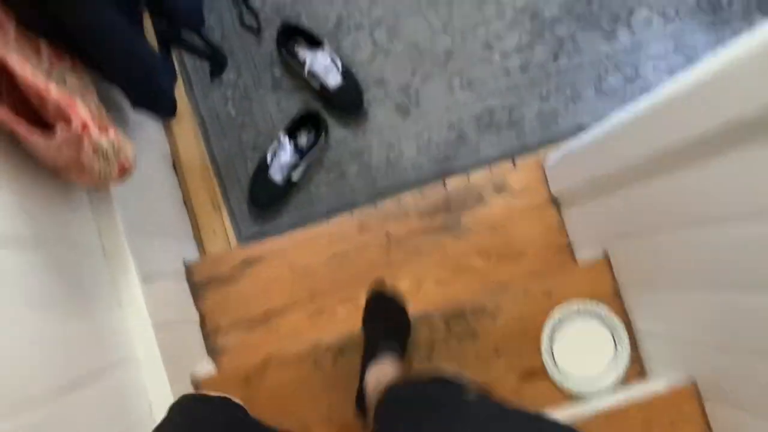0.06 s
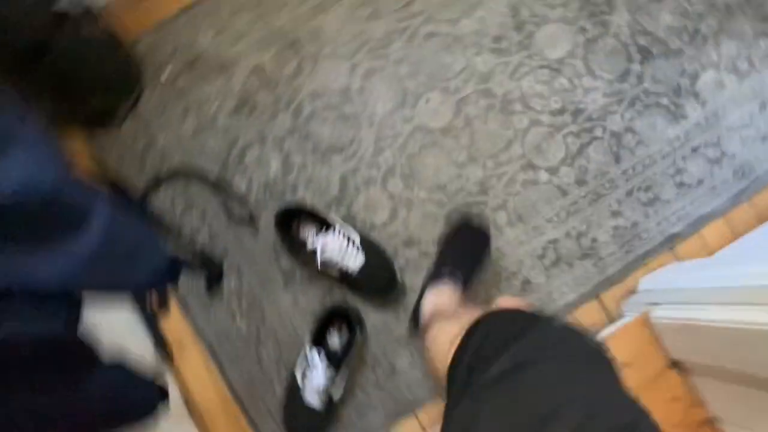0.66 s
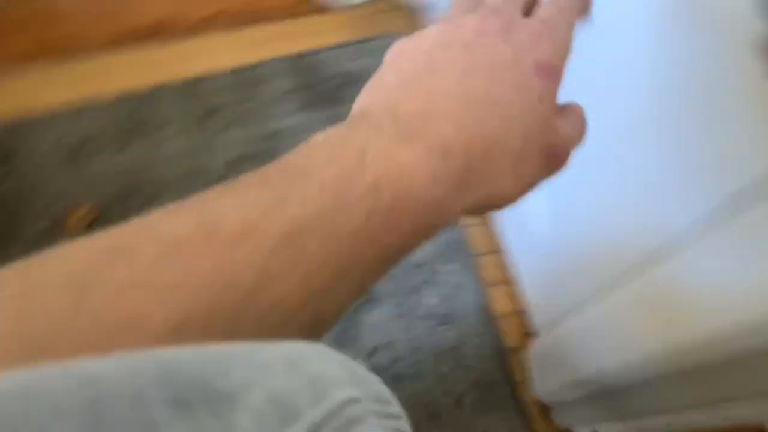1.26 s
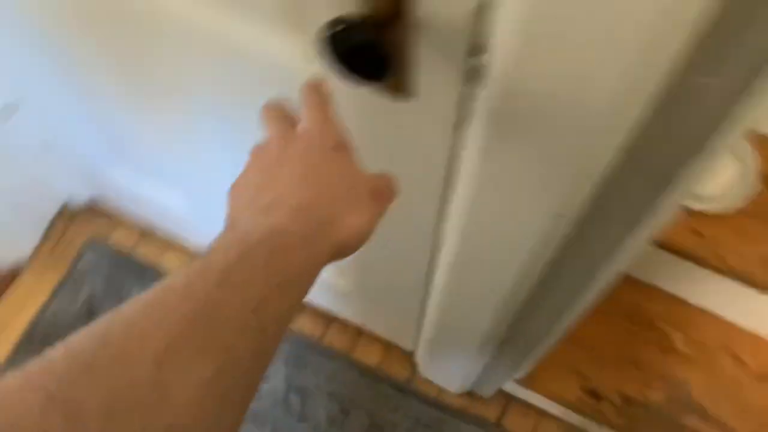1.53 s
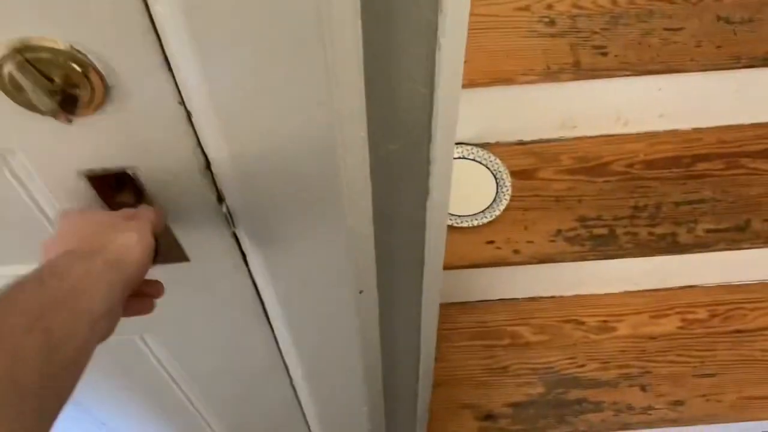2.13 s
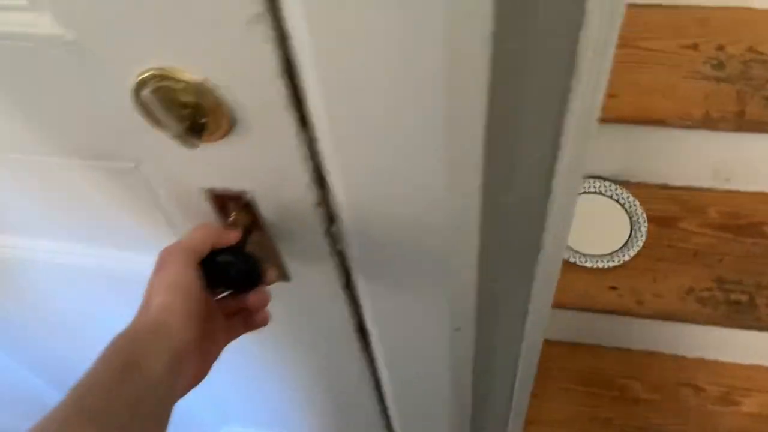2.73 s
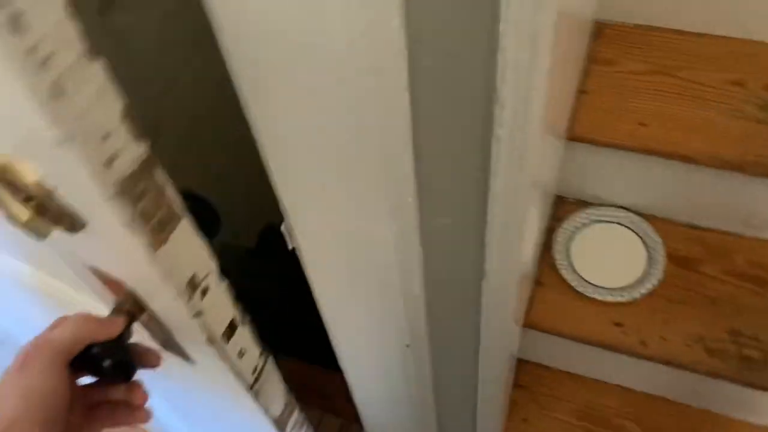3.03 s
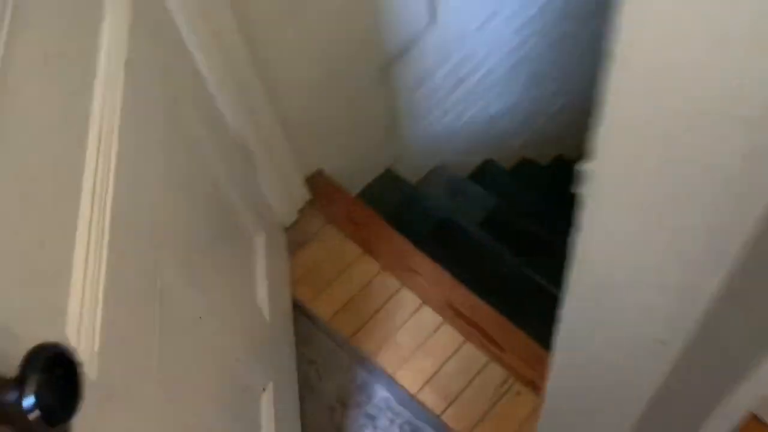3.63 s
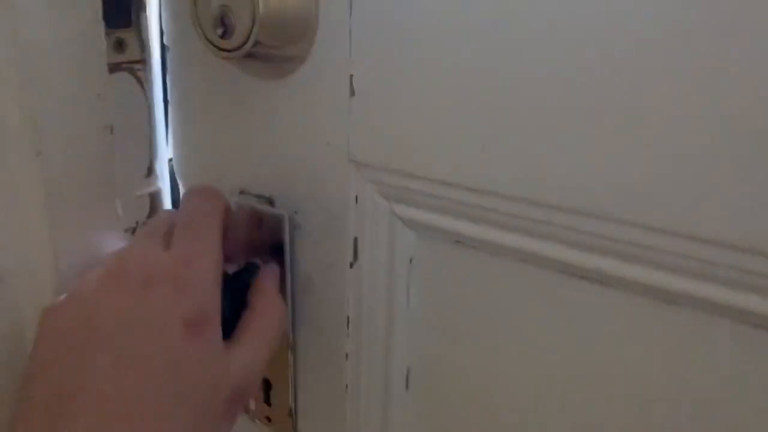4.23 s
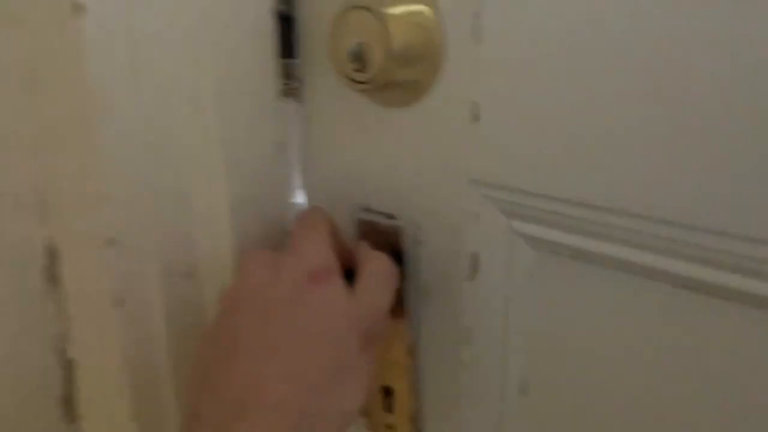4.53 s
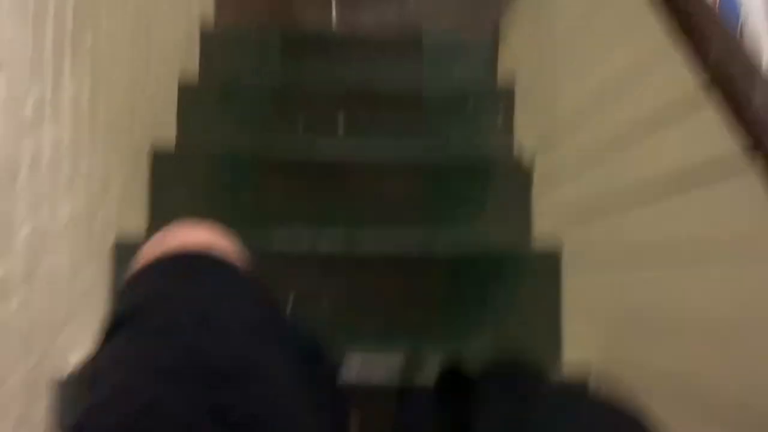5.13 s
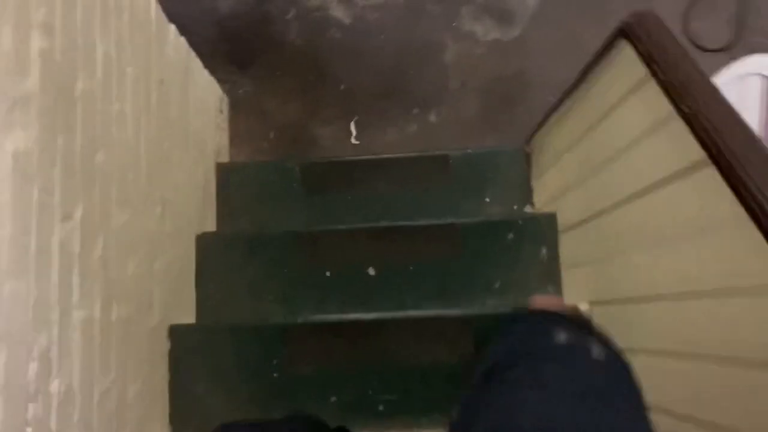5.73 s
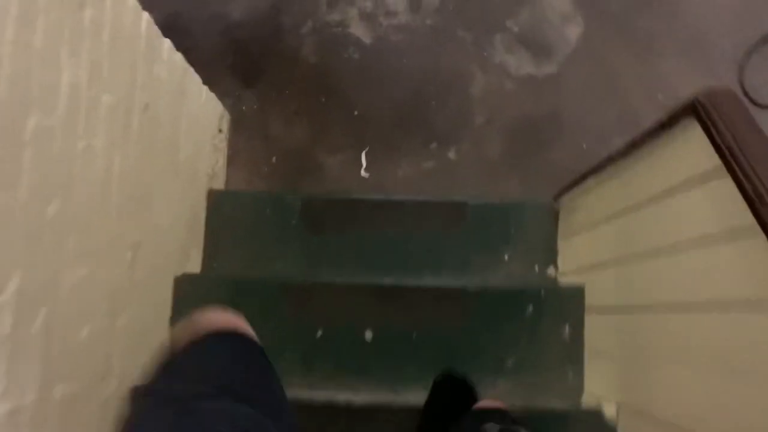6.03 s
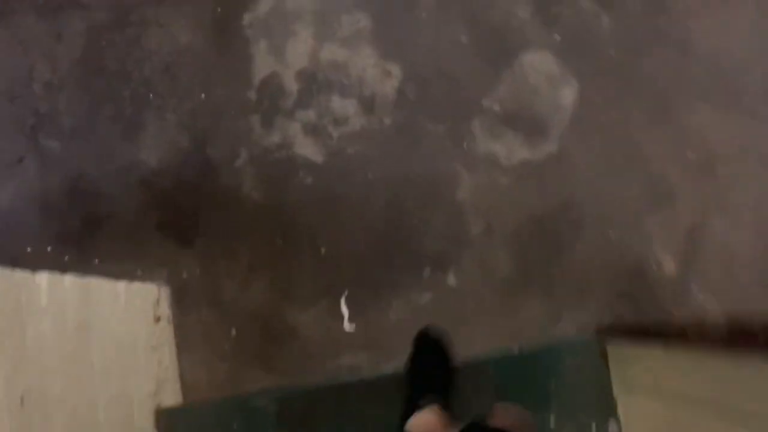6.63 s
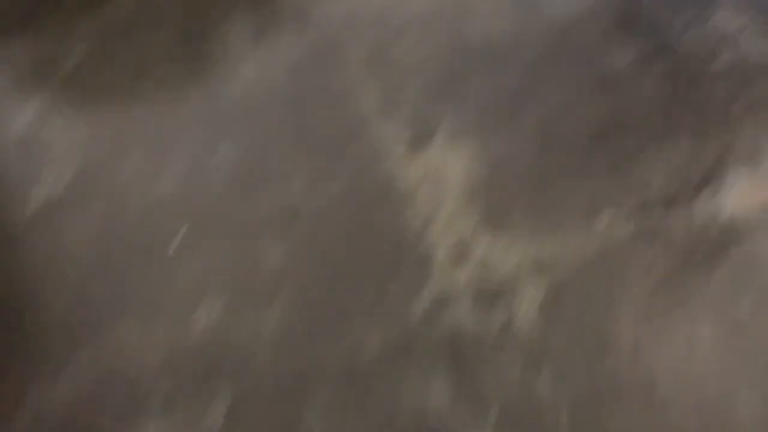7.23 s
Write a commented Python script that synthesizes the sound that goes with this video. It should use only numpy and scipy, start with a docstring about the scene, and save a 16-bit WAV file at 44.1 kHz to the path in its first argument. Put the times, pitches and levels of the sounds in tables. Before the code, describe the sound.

Socked feet thud down wooden stairs in a house, the boards ringing hollowly, and clothes rustle close to the microphone. An old doorknob rattles and clicks, then the door opens with a short, high hinge squeal. The door rubs and clatters, then bangs shut with a metal latch snap. Softer footsteps go down a second flight over a low room hush.

```python
"""A house with wooden stairs. Someone in socks thuds down a flight, ringing the boards, crosses a rug
and rattles an old door knob. The door swings open; its dry hinge sticks, slips and squeals. Pulled shut
from behind, it bangs and latches with a metal snap. Steps go down a second flight to a cellar floor.
Clothes rustle close by, over a low hush."""
import sys
import numpy as np
from scipy import signal
from scipy.fft import rfft, irfft, next_fast_len
from scipy.io import wavfile
from scipy.ndimage import uniform_filter1d

SR = 44100
rng = np.random.default_rng(int(sys.argv[2]) if len(sys.argv) > 2 else 0)


def store_wav(level_fs):
    """Save 16-bit WAV to argv[1]."""
    pcm = np.round(np.clip(np.atleast_2d(level_fs), -1, 1) * 32767)
    wavfile.write(sys.argv[1], SR, pcm.T.astype(np.int16))


N = 328986
TIME_S = np.arange(N) / SR
AGE_S = TIME_S[:36000]  # time since a strike
BEHIND_S, CELLAR_S = 3.7, 5.092  # door heard from behind; second flight; ringing is cut off at each
TOP_HZ = 16100
BOARD_OVERTONE_RATIO = 1.67

# Table levels are relative; the functions add their own gains.
# Footsteps. Each row: start in seconds, leg swing, toe and sole in dB, landing lag in seconds,
# boom and knock in dB, roll to the heel in seconds, scuff in dB.
STEPS = [(.104, -70.5, -45, -63, 0.063, -37, -42.5, 0.032, -47.5),
         (.449, -56, -42, -68, 0.025, -36, -39.5, 0.013, -50.5),
         (.766, -84, -46, -40, 0.0064, -16.5, -33, 0.091, -44.5),
         (1.271, -68.5, -59, -48, 0.011, -27, -48, 0.044, -58),
         (5.357, -62, -49, -74, 0.016, -28, -33.5, 0.16, -56),
         (5.871, -62.5, -45, -47.5, 0.03, -34, -39, 0.15, -50),
         (6.315, -63.5, -43, -38, .03, -28, -31, .125, -56),
         (6.671, -58, -46, -48, 0.034, -37.5, -39.5, 0.054, -59),
         (7.19, -62.5, -54.5, -73, 0.032, -40, -56, 0.029, -60)]
# Flights. Each: boom in Hz, boom and knock t60 in seconds, tread ring in Hz, ring over knock in dB,
# heel over landing in dB.
UPPER_FLIGHT = (44, 0.61, 1.38, 173, -0.5, -22)
CELLAR_FLIGHT = (54.5, 0.21, 0.29, 100, 1.5, -6)
# Sole slaps and board ticks. Each row: start in seconds, slap in dB, tick in dB, t60 in seconds.
TAPS = [(.105, -61, -72, 0.017), (.178, -61, -89, 0.25), (.218, -50.5, -52.5, 0.074),
        (.467, -51, -57.5, 0.037), (.765, -54, -87, 0.029), (.86, -62, -67.5, 0.41),
        (1.022, -61, -62.5, 0.017), (5.958, -59, -83, 0.042), (6.364, -52, -65, 0.038),
        (6.459, -48, -54.5, 0.027), (6.786, -57.5, -67, 0.14), (7.192, -53.5, -55.5, 0.016)]
# Boards and door ringing at one pitch. Each row: start in seconds, level in dB, pitch in Hz, t60 in seconds.
BOARD_KNOCKS = [(.119, -30, 66, 0.24), (0.174, -25.5, 59, 0.39), (.452, -32, 207.4, 0.27),
                (.478, -29.5, 64.4, 0.44), (.665, -43.5, 380, 0.11), (.777, -20, 166.7, 0.32),
                (.776, -29.5, 259, .33), (.82, -47.5, 555, 0.84), (1.28, -39, 250, 0.18),
                (4.124, -29, 174.4, 0.22), (4.141, -31, 1260, 0.042), (4.799, -16, 387, 0.064),
                (4.8, -27.5, 868, 0.088), (4.809, -13, 141.4, 0.21), (4.866, -19, 109, 0.2),
                (5.368, -43.5, 332, 0.34), (5.385, -28, 125.7, 0.49), (5.906, -27, 74.8, 0.44),
                (6.386, -14.5, 81.4, 0.11), (6.398, -38, 1040, 0.071)]
# Board and panel modes. Each row: frequency in Hz, level in dB, share of the knock's t60.
BOARD_MODES = [(91.6, 4, 0.41), (129.4, -4, 0.99), (159.2, 8, 0.37), (210.6, 0.5, 0.71), (314, -26, 0.2),
               (434.6, -10, 0.72)]
# Clothes. Each row: centre in seconds, half-length in seconds, scuff in dB, swish in dB.
RUSTLES = [(1.52, 0.28, -55, -59.5), (5.73, 0.11, -60.5, -62.5), (7.44, 0.065, -82, -47)]
# Hand strokes on knob and door. Each row: peak in seconds, panel shudder in dB, scuff in dB.
HAND_STROKES = [(1.86, -37.5, -41), (2.267, -34, -43), (2.93, -42, -49.5), (3.265, -78, -41.5),
                (3.36, -38.5, -41), (4.2, -31, -46.5), (4.451, -28.5, -39), (4.878, -22.5, -34.5)]
# Knob, latch and door edge. Each row: start in seconds, wood in dB, metal in dB, t60 in seconds.
CLACKS = [(1.782, -44, -43.5, 0.027), (1.802, -28.5, -27, 0.063), (2.094, -30, -28.5, 0.0066),
          (2.246, -41, -57, 0.064), (2.327, -36.5, -44.5, 0.07), (2.609, -26.5, -25, 0.02),
          (2.622, -35, -32, 0.13), (2.705, -38.5, -38.5, 0.094), (2.895, -39.5, -66, 0.081),
          (3.272, -44.5, -39, 0.083), (3.332, -36.5, -34.5, 0.067), (3.418, -43, -43, .1),
          (4.046, -33.5, -32.5, 0.063), (4.113, -45.5, -51, 0.11), (4.184, -30, -47, 0.044),
          (4.192, -33.5, -59, 0.07), (4.206, -33, -43, 0.059), (4.217, -39, -64, .04),
          (4.291, -36, -41, 0.033), (4.375, -37, -36.5, 0.16), (4.397, -40, -37.5, 0.24),
          (4.43, -32.5, -38, 0.13), (4.672, -43, -47, 0.03), (4.784, -30.5, -27.5, 0.039),
          (4.814, -36, -26.5, 0.029), (4.827, -35, -41, 0.43), (4.874, -33, -28.5, 0.04),
          (4.894, -40, -23, 0.015), (4.9, -33, -28.5, 0.038), (4.994, -37, -55, 0.071),
          (5.066, -39.5, -31, 0.006)]
# Door against frame. Each row: start in seconds, boom, knock and panel ring in dB, ring in Hz.
DOOR_BUMPS = [(1.803, -58, -38, -35.5, 308), (2.324, -26.5, -37.5, -37.5, 315), (2.607, -37, -36, -29, 332),
              (3.345, -66, -53, -32, 327), (3.709, -33, -44, -43, 162), (3.904, -34, -28.5, -39.5, 660),
              (4.441, -18.5, -37, -35.5, 149), (4.805, -7.5, -21.5, -32, 460),
              (4.912, -12.5, -37, -53, 404), (5.006, -11.5, -60, -33, 108)]
# Door sides. Each: boom in Hz, boom t60 in seconds, knock t60 in seconds.
DOOR_FRONT, DOOR_BEHIND = (46, 0.68, 0.92), (52.1, 0.24, 0.32)
# Latch. Each row: start in seconds, snap in dB, spring zing in dB.
LATCH_SNAPS = [(1.801, -20, -38), (1.95, -44.5, -69), (2.094, -27, -43), (2.327, -34.5, -58),
               (2.609, -29, -30), (4.047, -38, -48), (4.376, -46, -39), (4.812, -23, -52),
               (4.893, -28.5, -51), (4.899, -30, -51)]
# Small metal parts. Each row: start in seconds, level in dB, pitch in Hz, t60 in seconds.
TWANGS = [(2.61, -45, 6480, .38), (2.721, -55, 4590, 1.1), (4.046, -55, 4640, .63)]
# Hinge stick-slip rate. Each row: time in seconds, rate in Hz.
HINGE_PITCH = [(2.915, 2540), (3.025, 2807), (3.06, 2780), (3.105, 2570), (3.2, 2551), (3.33, 2470),
               (3.4, 2427), (3.435, 2305), (3.5, 2150), (3.58, 2066), (3.69, 2030)]
# Hinge strength. Each row: time in seconds, fundamental, octave and higher overtones in dB.
HINGE_LEVELS = [(2.883, -44, -49, -74.5), (2.9, -37, -38.5, -52.5), (2.94, -37.5, -44.5, -50),
                (3.085, -35.5, -44, -43.5), (3.125, -24.5, -33.5, -38.5), (3.185, -26, -56, -46),
                (3.213, -24.5, -38.5, -39.5), (3.291, -29, -33, -37.5), (3.388, -41, -44.5, -38),
                (3.44, -36.5, -34, -42), (3.53, -36.5, -36, -34), (3.62, -37, -47, -32.5),
                (3.663, -28.5, -45, -31), (3.693, -46, -62, -47)]
# Hinge harmonics from the third up. Each entry: level in dB.
HINGE_OVERTONES_DB = [2.5, -4, -6, 1.5, 9, -6]
# Hinge rasps as the door speeds up and slows. Each row: centre and half-width in seconds, strength 0-1.
HINGE_RASPS = [(2.985, .075, .9), (3.335, .04, .9), (3.45, .065, 1)]
# Lock case modes. Each row: frequency in Hz, level in dB.
LOCK_MODES = [(690, -2), (845, 5), (1125, 3), (2300, 2), (2875, -11)]

# Tone colours of the sounds as heard, several with a narrow treble gap near 12 kHz.
# Each row: frequency in Hz, spectral level in dB.
HUSH_EQ = [(20, -1), (45, 8), (120, -6), (300, -14), (700, -26), (3000, -28), (9000, -37.5), (12000, -61),
           (16000, -37)]
SCUFF_EQ = [(200, 8.5), (500, 5.5), (1200, 3.5), (1700, -2), (2500, -2), (4000, -19.5), (9000, -51)]
SWISH_EQ = [(1200, -8), (3800, 0), (7000, -5), (9800, -4), (11800, -27), (13800, -6.5), (16000, -66)]
SHUDDER_EQ = [(30, -21), (70, 11.5), (160, -4.5), (400, -10), (900, -25.5), (2500, -46)]
PANEL_FRONT_EQ = [(40, -9), (100, -11), (145, 9), (310, -2.5), (500, -2), (900, -35), (2500, -67)]
PANEL_BEHIND_EQ = [(40, 1.5), (100, -3), (150, -2), (195, -5.5), (250, -64), (430, -14), (1000, -110)]
WOOD_FRONT_EQ = [(120, -8), (300, -49.5), (550, -4.5), (1100, 8.5), (1600, -3), (2200, 2.5), (3200, -7),
                 (5000, -10.5), (12000, -62)]
WOOD_BEHIND_EQ = [(300, -39), (750, 0.5), (1150, 5.5), (2800, -1), (5000, -10), (12000, -39)]
METAL_EQ = [(800, -25), (2500, 0.5), (4000, 6.5), (6000, 2), (9300, 1.5), (10800, 0), (11900, -52),
            (13800, 1), (16000, -36)]
SNAP_EQ = [(3000, -19), (9500, 3), (11800, -5), (14000, -9), (16000, -16)]
SPRING_EQ = [(11800, -29), (13300, 17), (14300, 0), (15100, 6), (15700, -12)]
HINGE_EQ = [(6200, 1.5), (7500, -9), (8400, 3.5), (10000, 6), (11500, 0), (14300, 4.5), (15500, -7.5)]
# Stairwell decay. Each row: frequency in Hz, t60 in seconds.
STAIRWELL_T60 = [(200, 0.064), (1000, 0.35), (3000, 0.24), (8000, 0.19), (15000, 0.046)]
# Stereo likeness. Each row: frequency in Hz, left-right correlation.
CORRELATION = [(250, 0.83), (500, 0.43), (1200, 0.049)]


def gain(db):
    """Decibels to amplitude."""
    return 10 ** (np.asarray(db) / 20)


def unit_rms(x):
    """Scales to rms 1."""
    return x / np.sqrt(np.mean(x ** 2) + 1e-20)


def lookup(table, hz):
    """Interpolates on a log-frequency axis."""
    table_hz, value = np.transpose(table)
    return np.interp(np.log(hz + 1), np.log(table_hz + 1), value)


def decay(t60_s):
    """Exponential decay after a strike."""
    return np.exp(-np.log(1000) * AGE_S / np.maximum(t60_s, 1e-3))


def rise(contact_s):
    """Smooth build-up over a contact."""
    return np.sin(np.pi / 2 * np.minimum(AGE_S / contact_s, 1)) ** 2


def drift(count, hz):
    """Random drift, rms 1, rolled off above hz."""
    bins_hz = np.fft.rfftfreq(count, 1 / SR)
    return unit_rms(irfft(rfft(rng.standard_normal(count)) * np.exp(-(bins_hz / hz) ** 2), count))


def noise(eq, count=len(AGE_S)):
    """Coloured stereo noise, rms 1; bass nearly alike on both sides."""
    size = next_fast_len(count, True)
    hz = np.fft.rfftfreq(size, 1 / SR)
    mid, side = rfft(rng.standard_normal((2, size))) * gain(lookup(eq, hz))
    alike = lookup(CORRELATION, hz)
    mid, side = mid * np.sqrt(1 + alike), side * np.sqrt(1 - alike)
    return unit_rms(irfft([mid + side, mid - side], size)[:, :count])


def resonant(eq, ripple_db, spacing_hz):
    """Gives a spectrum the narrow random peaks of one object."""
    hz = np.arange(100, TOP_HZ, spacing_hz)
    peaks_db = ripple_db * np.clip(rng.standard_normal(len(hz)), -2, 1)
    return np.transpose([hz, lookup(eq, hz) + peaks_db])


def add(mix, start_s, sound):
    """Mixes a sound in; fades it out just before the next cut-off."""
    part = mix[:, max(round(start_s * SR), 0):][:, :sound.shape[-1]]
    stop_s = min(s for s in (BEHIND_S, CELLAR_S, np.inf) if s > start_s)
    fade = np.clip((stop_s - start_s - TIME_S[:part.shape[1]]) / 0.019, 0, 1)
    part += sound[..., :part.shape[1]] * fade


def house_hush():
    """Steady low background."""
    return gain(-52) * noise(HUSH_EQ, N)


def cloth_strokes(swing_lead_s=0.059, swing_half_s=0.115, sock_half_s=0.095, grit_half_s=0.072):
    """Leg swings, rolling socks, grit on cellar treads and clothes; rows as in RUSTLES."""
    for start_s, swing_db, _, sole_db, lag_s, _, _, roll_s, scuff_db in STEPS:
        land_s = start_s + lag_s
        yield land_s - swing_lead_s, swing_half_s, swing_db - 0.5, swing_db
        yield land_s + roll_s, sock_half_s, scuff_db, scuff_db - 5
        if start_s > CELLAR_S:
            yield land_s + grit_half_s / 2, grit_half_s, sole_db - 11, sole_db - 18.5
    yield from RUSTLES


def cloth_rustle(grain_db=1.94):
    """Cloth slides by in grainy swells, each with its own colour."""
    out = np.zeros((2, N))
    for centre_s, half_s, scuff_db, swish_db in cloth_strokes():
        count = round(2 * half_s * SR)
        cloth = gain(scuff_db) * noise(resonant(SCUFF_EQ, ripple_db=5.5, spacing_hz=110), count)
        cloth += gain(swish_db) * noise(resonant(SWISH_EQ, ripple_db=3, spacing_hz=300), count)
        swell = np.hanning(count) * gain(grain_db * drift(count, hz=141))
        part = out[:, max(round((centre_s - half_s) * SR), 0):][:, :count]
        part += (cloth * swell)[:, :part.shape[1]]
    return out


def ring_strikes(toe_hz=299, click_hz=1030):
    """Toe, sole, weight and door strike boards. Each row: start in seconds, level in dB, pitch in Hz."""
    for start_s, _, toe_db, sole_db, lag_s, _, knock_db, _, _ in STEPS:
        *_, tread_hz, ring_db, _ = UPPER_FLIGHT if start_s < CELLAR_S else CELLAR_FLIGHT
        yield start_s, toe_db, toe_hz
        yield start_s + lag_s, knock_db + ring_db, tread_hz
        yield start_s + lag_s, knock_db + ring_db - 5, tread_hz * BOARD_OVERTONE_RATIO
        if start_s < CELLAR_S:
            yield start_s, sole_db, click_hz
    for start_s, _, _, ring_db, hz in DOOR_BUMPS:
        yield start_s, ring_db, hz


def hollow_rings(ref_hz=300, ref_t60_s=0.36, ref_attack_s=0.0029):
    """Struck boards ring in narrow noise bands; higher ones start and die sooner."""
    out = np.zeros((2, N))
    for start_s, db, hz in ring_strikes():
        band = [(hz / 3, -35), (hz * 0.63, -8), (hz, 0), (hz * 1.37, -8), (hz * 2, -24), (hz * 10, -80)]
        envelope = decay(ref_t60_s * np.sqrt(ref_hz / hz))
        envelope *= rise(ref_attack_s * min(ref_hz / hz, 1) ** 2)
        ring = unit_rms(noise(band) * envelope) * np.sqrt(np.mean(envelope ** 2))
        add(out, start_s, gain(db) * ring)
    return out


def stairwell_tail(eq, count):
    """Diffuse reflections; the top treble dies first."""
    hz, time_s, bands = signal.stft(noise(eq, count), SR, nperseg=256)
    bands *= np.exp(-np.log(1000) * time_s / lookup(STAIRWELL_T60, hz)[:, None])
    return signal.istft(bands, SR, nperseg=256)[1][:, :count] * rise(0.0089)[:count]


def contacts(rows, eqs, trims_db, wets_db, attack_s, lead_in_db, snap_db):
    """Hard contacts: faint noise swells just before each crack; a tail follows. Pairs: (dull, bright)."""
    out = np.zeros((2, N))
    lead, count = 600, len(AGE_S) // 2
    lead_in = gain(lead_in_db) * np.linspace(0, 1, lead) ** 2
    for start_s, *levels_db, t60_s in rows:
        crack = (decay(t60_s) + gain(snap_db) * decay(0.0025)) * rise(attack_s)
        for eq, db, trim_db, wet_db in zip(eqs, levels_db, trims_db, wets_db):
            level = gain(db + trim_db)
            add(out, start_s - lead / SR, level * noise(eq, lead) * lead_in)
            add(out, start_s, level * noise(eq, count) * crack[:count])
            add(out, start_s, level * gain(wet_db) * stairwell_tail(eq, count))
    return out


def sole_taps():
    """Soles slap and boards tick."""
    sole_eq = resonant(SCUFF_EQ, ripple_db=6, spacing_hz=90)
    return contacts(TAPS, (sole_eq, SWISH_EQ), trims_db=(15.5, 15.5), wets_db=(-10, -11),
                    attack_s=0.00094, lead_in_db=-11, snap_db=-3)


def board_knocks(overtone_db=-12, attack_s=0.0042, spread_rad=0.46):
    """A struck board or door rings in its two lowest modes."""
    out = np.zeros((2, N))
    for start_s, db, hz, t60_s in BOARD_KNOCKS:
        phase = 2 * np.pi * hz * AGE_S + spread_rad * rng.standard_normal((2, 1))
        ring = np.sin(phase) * decay(t60_s)
        ring += gain(overtone_db) * np.sin(BOARD_OVERTONE_RATIO * phase) * decay(t60_s / 2)
        add(out, start_s, gain(db) * ring * rise(attack_s))
    return out


def blows():
    """Landing, heel and door blows. Each row: start in seconds, boom and knock in dB, body struck."""
    for start_s, _, _, _, lag_s, boom_db, knock_db, roll_s, _ in STEPS:
        *body, _, _, heel_db = UPPER_FLIGHT if start_s < CELLAR_S else CELLAR_FLIGHT
        yield start_s + lag_s, boom_db, knock_db, body
        yield start_s + lag_s + roll_s, boom_db + heel_db, knock_db + heel_db, body
    for start_s, boom_db, knock_db, _, _ in DOOR_BUMPS:
        yield start_s, boom_db, knock_db, DOOR_FRONT if start_s < BEHIND_S else DOOR_BEHIND


def thuds(boom_rise_s=0.03, knock_rise_s=0.015):
    """A soft heavy blow bends the structure (boom) and rings its boards (knock)."""
    out = np.zeros((2, N))
    hz, mode_db, t60_share = np.transpose(BOARD_MODES)[:, :, None]
    for start_s, boom_db, knock_db, (boom_hz, boom_t60_s, knock_t60_s) in blows():
        boom = np.sin(2 * np.pi * boom_hz * AGE_S) * decay(boom_t60_s) * rise(boom_rise_s)
        add(out, start_s - boom_rise_s / 10, gain(boom_db + 2) * boom / abs(boom).max())
        # modes vary with the spot struck, phases with the side
        spot_hz = hz * (1 + 0.0476 * rng.standard_normal(hz.shape))
        phase = 2 * np.pi * rng.random(hz.shape) + hz / 170 * rng.standard_normal((2, len(hz), 1))
        modes = gain(mode_db) * np.sin(2 * np.pi * spot_hz * AGE_S + phase)
        knock = unit_rms((modes * decay(knock_t60_s * t60_share)).sum(1))
        knock *= np.sqrt(np.mean(decay(knock_t60_s) ** 2))
        shudder = gain(-1) * noise(SHUDDER_EQ) * decay(knock_t60_s)
        add(out, start_s, gain(knock_db) * rise(knock_rise_s) * (knock + shudder))
    return out


def rubbing_envelopes(rise_db_per_s=110, fall_db_per_s=73, shake_fall_db_per_s=62):
    """Shudder and scuff gains: strokes swell and fade; each clack leaves the loose door shaking."""
    power = np.zeros((2, N))
    offset_s = AGE_S - AGE_S.mean()
    swell_db = np.minimum(rise_db_per_s * offset_s, -fall_db_per_s * offset_s)
    for peak_s, shudder_db, scuff_db in HAND_STROKES:
        add(power, peak_s + offset_s[0], gain([shudder_db + swell_db, scuff_db + swell_db]) ** 2)
    for start_s, wood_db, _, _ in CLACKS:
        shake_db = wood_db - shake_fall_db_per_s * AGE_S
        add(power, start_s, gain([shake_db - 7, shake_db - 17.5]) ** 2 * rise(0.0068))
    return np.sqrt(power)


def door_rubbing(grain_db=2, fizz_db=-13):
    """Knob and door edge catch and slip in small grains, shaking the panel."""
    shudder, scuff = rubbing_envelopes()
    panel = np.where(TIME_S < BEHIND_S, noise(PANEL_FRONT_EQ, N), noise(PANEL_BEHIND_EQ, N))
    edge_eq = resonant(SCUFF_EQ, ripple_db=4, spacing_hz=85)
    grind = noise(edge_eq, N) + gain(fizz_db) * noise(SWISH_EQ, N)
    return panel * shudder + grind * scuff * gain(grain_db * drift(N, hz=120))


def door_clacks():
    """Knob, latch and edge strike wood and metal; drier and thinner from behind."""
    front_eq = resonant(WOOD_FRONT_EQ, ripple_db=7.5, spacing_hz=70)
    metal_eq = resonant(METAL_EQ, ripple_db=6.5, spacing_hz=130)
    front = contacts([row for row in CLACKS if row[0] < BEHIND_S], (front_eq, metal_eq),
                     trims_db=(2, 0.5), wets_db=(-3, -5.5), attack_s=0.0017, lead_in_db=-6, snap_db=-19)
    behind_eq = resonant(WOOD_BEHIND_EQ, ripple_db=7.5, spacing_hz=70)
    behind = contacts([row for row in CLACKS if row[0] > BEHIND_S], (behind_eq, metal_eq),
                      trims_db=(3.5, -0.5), wets_db=(-8.5, -10),
                      attack_s=0.001, lead_in_db=-12.5, snap_db=3)
    return front + behind


def latch_snaps(snap_t60_s=0.016, spring_t60_s=0.11, left_lag_s=0.00023):
    """Metal snaps on metal, right side first; the spring's high modes ring on."""
    out = np.zeros((2, N))
    for start_s, snap_db, zing_db in LATCH_SNAPS:
        spring_eq = resonant(SPRING_EQ, ripple_db=8, spacing_hz=120)
        add(out, start_s, gain(zing_db) * noise(spring_eq) * decay(spring_t60_s) * rise(0.001))
        snap = gain(snap_db) * noise(SNAP_EQ)[0] * decay(snap_t60_s)
        add(out, start_s + left_lag_s, snap * [[1], [0]])
        add(out, start_s, snap * [[0], [1]])
    return out


def metal_twangs(buzz_rad=0.15, spread_rad=0.5):
    """Knocked metal parts ring thinly, with a slight buzz."""
    out = np.zeros((2, N))
    for start_s, db, hz, t60_s in TWANGS:
        phase = 2 * np.pi * hz * AGE_S + spread_rad * rng.standard_normal((2, 1))
        phase += buzz_rad * drift(len(AGE_S), hz=200)
        add(out, start_s, gain(db) * decay(t60_s) * rise(0.0027) * np.sin(phase))
    return out


def hinge_squeal(wet_db=-7, pan_db=0.8, left_lag_s=13e-6, stutter_db=6, flutter_db=2):
    """Stick-slip in the dry hinge gives gliding harmonics; reflections make the overtones flutter."""
    knots_s, tone_db, octave_db, overtones_db = np.transpose(HINGE_LEVELS)
    time_s = np.arange(knots_s[0], knots_s[-1], 1 / SR)
    count = len(time_s)
    hz = np.interp(time_s, *np.transpose(HINGE_PITCH))
    hz = uniform_filter1d(hz, size=700, mode="nearest")  # door inertia rounds each bend
    # a rasp scatters the pitch and stutters the level
    rasp = sum(depth * np.exp(-((time_s - at_s) / half_s) ** 2) for at_s, half_s, depth in HINGE_RASPS)
    scatter = 1 + (0.0012 + 0.019 * rasp) * drift(count, hz=300)
    stutter = unit_rms(gain(stutter_db * rasp * np.tanh(drift(count, hz=254))))
    phase = 2 * np.pi * (np.cumsum(hz * scatter) / SR - np.array([[left_lag_s], [0]]) * hz)
    weights = {k: gain(db + lookup(HINGE_EQ, k * hz)) * (k * hz < TOP_HZ)
               for k, db in enumerate(HINGE_OVERTONES_DB, 3)}
    overtones = sum(weight * gain(flutter_db * drift(count, hz=110)) * np.cos(k * phase)
                    for k, weight in weights.items())
    overtones /= np.sqrt(sum(weight ** 2 for weight in weights.values()))
    out = np.zeros((2, N))
    layers = (np.cos(phase), tone_db - 1), (np.cos(2 * phase), octave_db - 1), (overtones, overtones_db)
    for wave, db in layers:
        envelope = gain(np.interp(time_s, knots_s, db)) * signal.windows.tukey(count, 0.02)
        direct = unit_rms(wave) * stutter * envelope
        walls = rng.standard_normal((2, len(AGE_S))) * decay(t60_s=0.37)
        reflected = signal.fftconvolve(direct, walls / np.linalg.norm(walls[0]), axes=1)
        add(out, knots_s[0], direct)
        add(out, knots_s[0], gain(wet_db) * reflected)
    return out * gain([[-pan_db], [pan_db]])


def lock_case(loose_until_s=4.3, t60_s=0.07, scatter_db=3):
    """Early in the closing swing, each clack rings the loose lock case with a new mix of modes."""
    out = np.zeros((2, N))
    hz, mode_db = np.transpose(LOCK_MODES)[:, :, None]
    for start_s, wood_db, _, _ in CLACKS:
        if BEHIND_S < start_s < loose_until_s:
            weights = gain(mode_db + scatter_db * rng.standard_normal(hz.shape))
            modes = weights * np.sin(2 * np.pi * (hz * AGE_S + rng.random((2, len(hz), 1))))
            add(out, start_s, gain(wood_db - 5) * modes.sum(1) * decay(t60_s))
    return out


def scene():
    """Door, feet and clothes over the hush of the house."""
    clatter = door_clacks() + lock_case() + sole_taps()
    rustle = door_rubbing() + cloth_rustle()
    hush = house_hush()
    wood = thuds() + hollow_rings() + board_knocks()
    metal = metal_twangs() + latch_snaps() + hinge_squeal()
    return clatter + rustle + hush + wood + metal


def record(dry, low_hz=28):
    """Microphone bass roll-off, then the band limit."""
    thinned = signal.sosfilt(signal.butter(2, low_hz, "high", fs=SR, output="sos"), dry)
    lowpass = signal.firwin(511, TOP_HZ, window=("kaiser", 9), fs=SR)
    return signal.oaconvolve(thinned, lowpass[None], "same")


dry = scene()
out = record(dry)
store_wav(out)
```